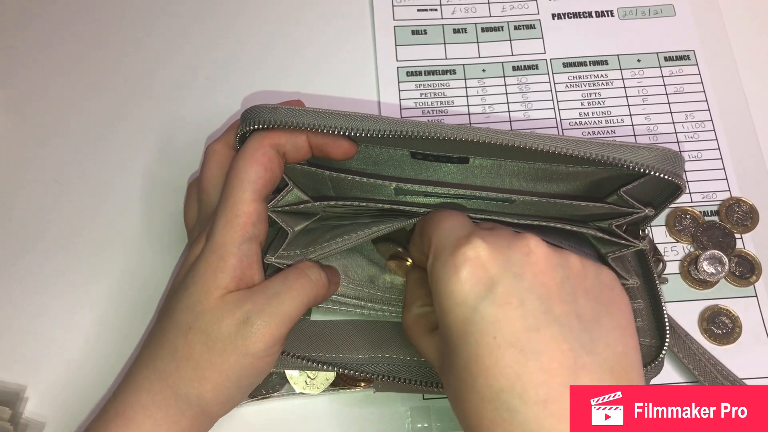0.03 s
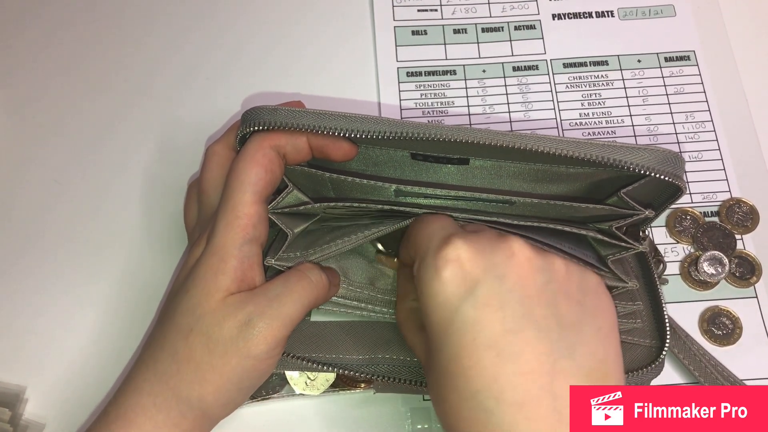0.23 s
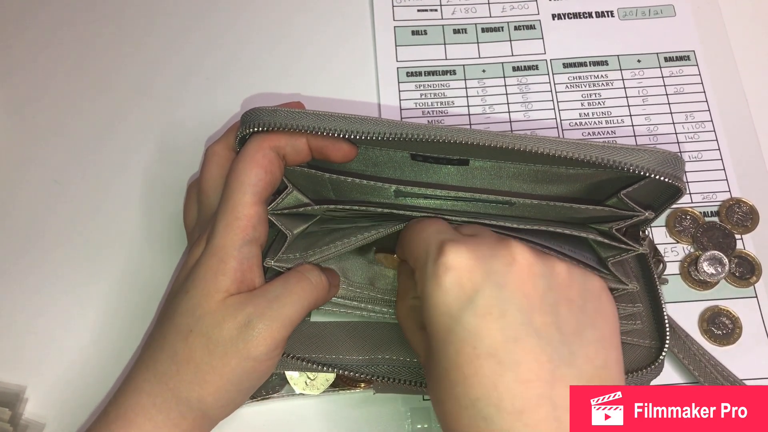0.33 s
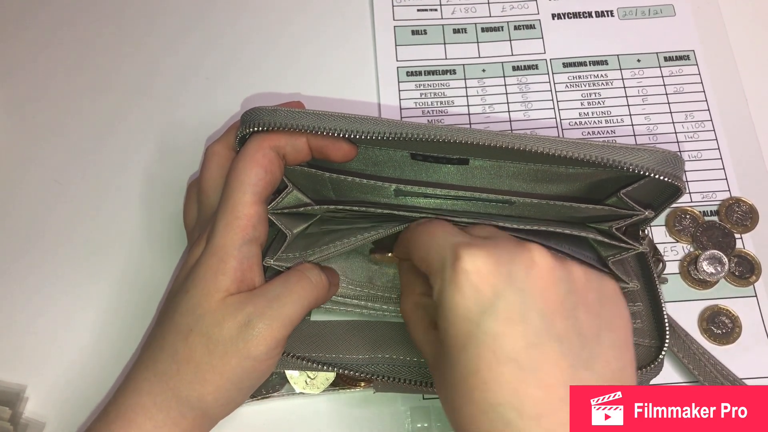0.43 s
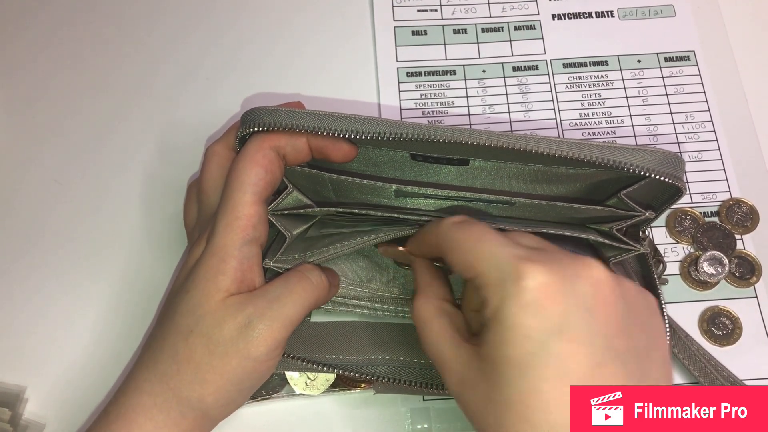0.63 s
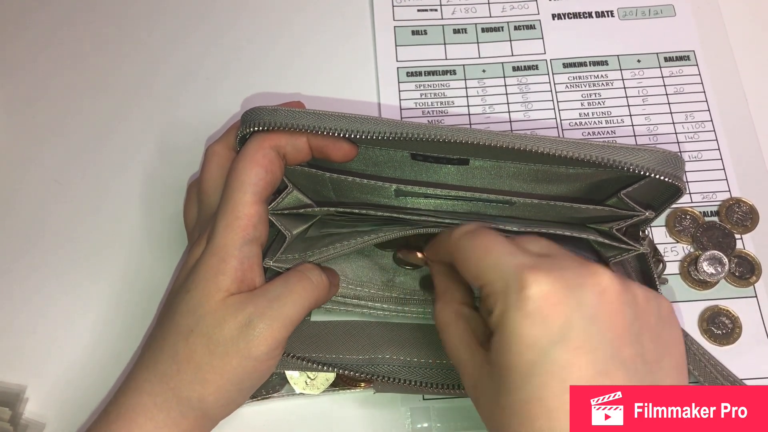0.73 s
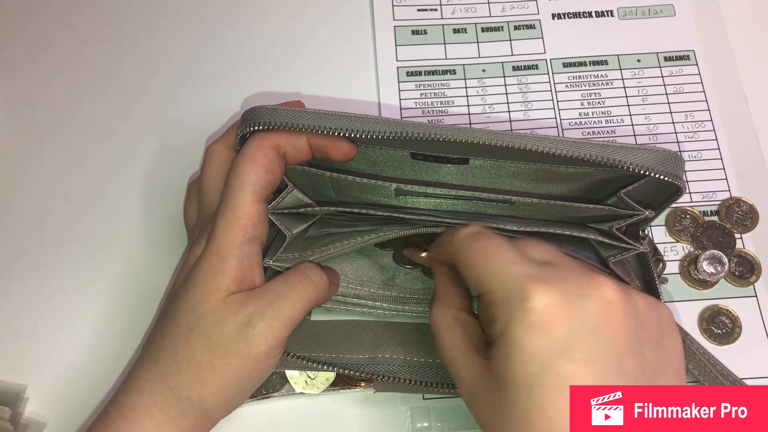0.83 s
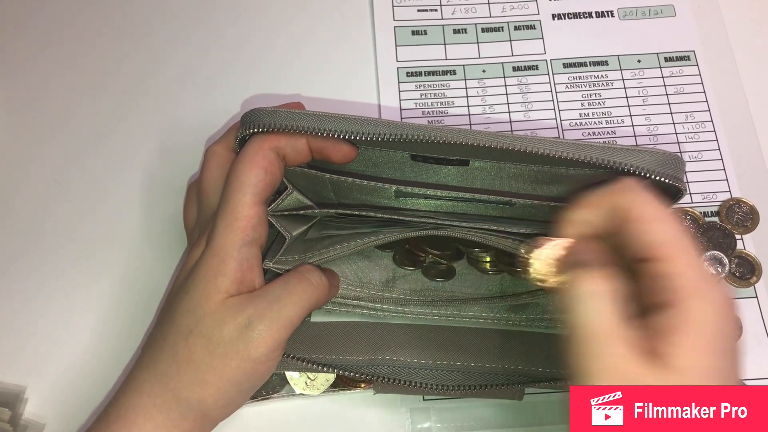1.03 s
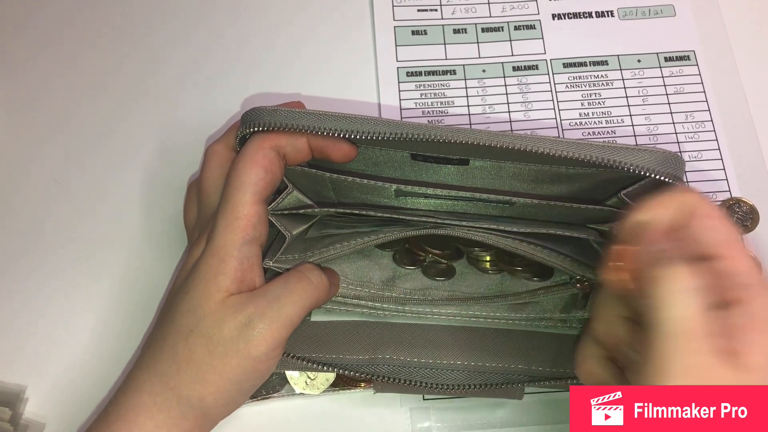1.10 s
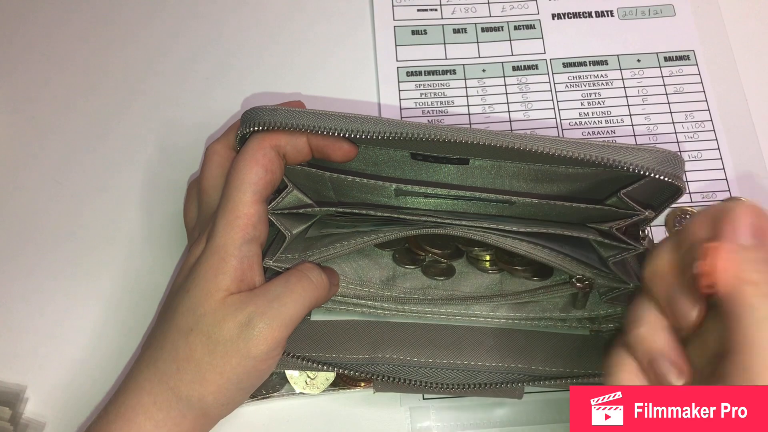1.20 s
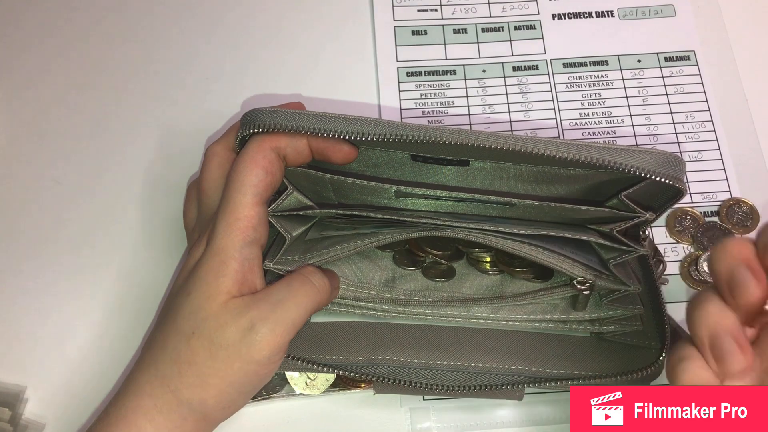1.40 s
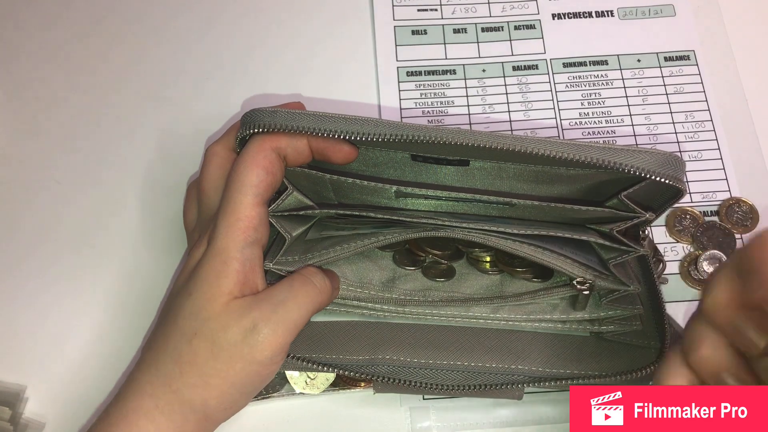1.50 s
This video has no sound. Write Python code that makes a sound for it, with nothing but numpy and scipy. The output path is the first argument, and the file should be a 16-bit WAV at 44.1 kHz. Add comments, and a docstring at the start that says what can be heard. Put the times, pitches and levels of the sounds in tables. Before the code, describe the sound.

Small coins clink in a wallet, close to the microphone. From about 0.1 to 0.45 seconds they slide and chatter with brief, very high rings, loudest near 0.2 seconds, while the lining rustles softly under the fingers. After a pause, a few more clicks and clacks come from 0.7 to 0.85 seconds. Faint ticks follow at 1 second, leaving quiet room air and a faint low hum.

```python
"""Coins picked from a zip wallet

On a table in a quiet room, close to the microphone, fingers pick out a few coins. Each contact is a tiny
chatter of metal that also knocks the wallet; loose coins ring very high and beat together, pinched ones
clack. In between, coins slide and the lining rustles. Behind lie room air, a faint mains hum and,
at the start, a soft low boom."""
import sys
import numpy as np
from scipy import signal
from scipy.fft import rfft, irfft, next_fast_len
from scipy.io import wavfile

SR = 44100
rng = np.random.default_rng(int(sys.argv[2]) if len(sys.argv) > 2 else 0)


def inscribe(sig):
    """Save sig as 16-bit PCM at rate SR to the path in sys.argv[1].

    A 1-D sig is mono; a 2-D sig holds one channel per row.
    Samples are clipped to [-1, 1] before scaling.
    """
    pcm = np.round(np.clip(np.atleast_2d(sig).T, -1, 1) * 32767)
    wavfile.write(sys.argv[1], SR, pcm.astype(np.int16))


N = 68355

# Spectrum of the room air: f/Hz, gain/dB
AIR_COLOUR = [(20, -36), (55, -5.5), (170, -11.5), (500, -23), (1000, -21.5), (2000, -29.5), (5000, -33),
              (16000, -37)]
# Coins sliding on each other, and fingers rubbing the lining: t/s, level/dB
SLIDE_LEVELS = [(0, -64), (.152, -74), (.168, -51), (.181, -53.5), (.205, -47), (.228, -41), (.25, -88),
                (.718, -88.5), (.729, -54.5), (.742, -55), (.748, -86), (.76, -63), (.805, -55.5),
                (.83, -73), (.9, -90.5)]
RUSTLE_LEVELS = [(0, -59), (.024, -61.5), (.06, -75), (.11, -68.5), (.3, -57), (.345, -64), (.4, -57),
                 (.47, -65.5), (.58, -66), (.63, -82), (.72, -80), (.775, -67), (.84, -66.5), (.89, -81.5),
                 (1.18, -82.5), (1.23, -76), (1.3, -84.5)]
# Spectra of that sliding and rubbing: f/Hz, gain/dB
SLIDE_COLOUR = [(500, -30), (4500, -20), (6500, -14), (11500, -11), (13200, -2), (15400, 0), (16000, -13)]
RUSTLE_COLOUR = [(300, 0.5), (550, -8), (1060, 2), (1210, -10.5), (1400, -1), (3300, -7), (4300, -6.5),
                 (7500, -11.5), (16000, -18)]
# Coin contacts: t/s, wallet knock/dB, knock centre/Hz, rim click/dB, sizzle/dB, chatter hold/ms, fade/ms
CONTACTS = [ (0.1015, -77, 2500, -51, -52, 0.36, 2), (0.1475, -67, 3030, -52.5, -50, 3.3, 1.5),
            (0.1615, -70, 3020, -50, -46, 0.56, .6), (0.1652, -69, 3000, -50, -46, 1, 1.5),
            (.2050, -48, 900, -62, -58, 1.8, 2.2), (0.2096, -53, 394, -51, -46, 4.7, 3.4),
            (0.2169, -41, 3600, -28.5, -19.5, 0.29, 0.23), (0.2259, -46, 3010, -53, -41, 0.41, 0.91),
            (.2582, -38, 3360, -34.5, -34.5, 1.34, 0.76), (0.2609, -45.5, 1300, -52, -66, 2, 6),
            (0.2882, -48, 3350, -44.5, -64, 1.1, 1.4), (.306, -52, 3000, -41.5, -70, 0.77, 1.5),
            (0.3068, -51, 1250, -47.5, -76, 0.86, 3.9), (0.357, -44, 2150, -52, -59, 1.1, 2.9),
            (0.3608, -43, 3570, -47.5, -49, 2.6, 1.6), (0.3641, -43, 3300, -41, -38, 1.6, 2.7),
            (0.3727, -59.5, 2520, -59, -54, 5.8, 0.89), (0.405, -44, 4030, -46, -42.5, 3.1, 3),
            (0.4220, -53.5, 2200, -56.5, -55, 2.6, 4.6), (0.7292, -52, 1600, -53, -64, 3.9, 2.1),
            (0.736, -52.5, 1210, -59, -56, 3.9, 3.1), (0.7558, -48, 1480, -60, -56, 1.1, 7.4),
            (0.7637, -38, 1200, -52, -62, 1.5, 1.2), (0.8075, -46, 3400, -41, -36, 1.3, 3.9),
            (0.8146, -49.5, 2920, -45.5, -44.5, 4.9, 4), (1.001, -59.5, 2600, -57.5, -63, 0.41, 1.9),
            (1.013, -63, 3400, -65, -83, 0.65, 1.4)]
# Spectra of the wallet's knock, the rims' click and the sizzle on top: f/Hz, gain/dB
WALLET_COLOUR = [(100, -24.5), (450, -6.5), (750, 0), (1050, 0), (1350, -2.5), (2000, -4.5), (2800, -3),
                 (4200, -2), (5100, -15.5), (9000, -23)]
RIM_COLOUR = [(300, -32.5), (2500, -10), (5000, -11.5), (5600, -3), (6400, -0.5), (7500, -5), (9200, 1),
              (10600, -7.5), (11800, -5.5), (13500, -2), (17000, -41)]
SIZZLE_COLOUR = [(7000, -38), (10500, -10), (12000, 0), (13200, 2), (14500, -4), (15700, -7), (16500, -22)]
# Touches that set loose coins ringing: t/s, relative level/dB, base t60/s, lead offset from COIN_HZ/Hz
RING_TOUCHES = [(0.1657, -56, 0.04, 0), (0.2097, -29, 0.07, 290), (0.2171, -23, 0.055, -4),
                (0.2324, -41.5, .3, -190), (0.2582, -44, .28, -190), (.2890, -35, 0.07, 0),
                (0.298, -38, 0.059, 290), (0.3056, -34, 0.065, -4), (0.3607, -22.5, 0.047, 224),
                (0.3721, -30.5, 0.05, -190), (0.382, -32, 0.066, 0), (0.3863, -28.5, 0.053, 1),
                (0.4065, -34.5, 0.049, 2), (0.423, -38.5, 0.042, -4), (0.807, -39, 0.024, -100)]
# Modes of the coins: offset from COIN_HZ/Hz, relative level/dB, multiple of the base t60
COIN_MODES = [(-745, -17, 0.4), (-190, -9, 1.4), (-3, -4, 0.78), (285, -11, 0.45), (1150, -29, 0.43)]
# Clacks of pinched coins and of the pocket they strike: t/s, f/Hz, level/dB
CLACKS = [(.2055, 275, -48), (0.2582, 2650, -37.5), (.2582, 3030, -37), (0.2597, 1353, -37),
          (0.3604, 3430, -39.5), (.3615, 275, -52.5), (0.407, 4310, -35.5), (0.4065, 2925, -37.5),
          (.4062, 855, -44.5), (0.7296, 5330, -39), (0.7301, 1014, -48), (.73, 320, -54.5),
          (.7638, 2306, -38), (.7638, 1050, -40), (.7638, 833, -45), (.7638, 383, -49), (.8076, 2760, -38),
          (.8078, 1032, -39), (0.8143, 9830, -27), (.8144, 3700, -43), (0.984, 2450, -64),
          (1.0011, 2530, -56.5), (1.013, 2460, -64)]
# Spectrum of the room's reflections: f/Hz, gain/dB
ROOM_COLOUR = [(200, 0), (1200, 1.5), (5000, -9.5), (16000, -10.5)]

COIN_HZ = 13185
GRAIN_S = .0007  # time scale of catching and slipping


def undb(db):
    """Decibels to gain."""
    return 10 ** (np.asarray(db) / 20)


def unit(x):
    """Scale to rms 1."""
    return x / np.sqrt(np.mean(x ** 2))


def colour(x, points, extra_db=None):
    """Causal filter through points of f/Hz, gain/dB; extra_db adds gain as a function of frequency."""
    size = 2 * next_fast_len(len(x))
    f = np.maximum(np.fft.rfftfreq(size, 1 / SR), 1)
    point_hz, point_db = np.array(points, float).T
    db = np.interp(np.log(f), np.log(point_hz), point_db) + (extra_db(f) if extra_db else 0)
    cepstrum = irfft(np.log(undb(db)))
    cepstrum[1:size // 2] *= 2  # fold to minimum phase
    cepstrum[size // 2 + 1:] = 0
    return irfft(rfft(x, size) * np.exp(rfft(cepstrum)))[:len(x)]


def add(out, start, x):
    """Mix x in at a time in seconds."""
    i = int(start * SR)
    out[i:i + len(x)] += x[:len(out) - i]


def decay(t, t60):
    """Fall by 60 dB every t60 seconds."""
    return np.exp(-np.log(1000) * t / t60)


def grains(t):
    """A random curve with a new value every GRAIN_S."""
    return np.interp(t / GRAIN_S, np.arange(len(t)), rng.standard_normal(len(t)))


def room_tone(hum_hz=49.3, boom_hz=52, boom_fade_s=.12):
    """Behind the wallet: room air, mains hum and a faint low boom dying away."""
    t = np.arange(N) / SR
    air = undb(-70.5) * unit(colour(rng.standard_normal(N), AIR_COLOUR))
    hum = undb(-73.5) * unit(np.sin(2 * np.pi * hum_hz * t))
    boom = undb(-58) * np.sin(2 * np.pi * boom_hz * t) * np.exp(-t / boom_fade_s)
    return air + hum + boom


def friction(levels, spectrum, grain_db):
    """Rubbing surfaces catch and slip: grainy noise that follows a level curve."""
    t = np.arange(N) / SR
    roughness = undb(grain_db * grains(t))
    rub = unit(colour(rng.standard_normal(N) * roughness, spectrum))
    return rub * undb(np.interp(t, *np.array(levels).T))


def chatter(env, strike_db=-7.5):
    """Metal meets metal: one clean impact, then a fading flurry of tiny ones with an even spectrum."""
    spectrum = rfft(env * rng.standard_normal(len(env)))
    flurry = irfft(spectrum / np.abs(spectrum)) * np.sqrt(env)
    flurry[0] += undb(strike_db) * np.sqrt(np.sum(flurry ** 2))
    return flurry


def coin_contacts(knock_lift_db=5.5, knock_width_oct=.41):
    """Each contact chatters and fades: a knock of the wallet, a click of the rims, a sizzle on top."""
    out, ms = np.zeros(N), np.arange(2048) / SR * 1000
    for start, knock_db, knock_hz, rim_db, sizzle_db, hold_ms, fade_ms in CONTACTS:
        env = np.exp(-np.maximum(ms - hold_ms, 0) / fade_ms)
        hollow = lambda f: knock_lift_db * np.exp(-.5 * (np.log2(f / knock_hz) / knock_width_oct) ** 2)
        knock = undb(knock_db) * unit(colour(chatter(env), WALLET_COLOUR, hollow))
        click = undb(rim_db) * unit(colour(chatter(env), RIM_COLOUR))
        sizzle = undb(sizzle_db) * unit(colour(chatter(env), SIZZLE_COLOUR))
        add(out, start, (knock + click + sizzle) * np.sqrt(np.mean(env ** 2)))
    return out


def coin_rings(level_db=-5, scatter_db=2.5, attack_s=.00074, grab_s=.0015):
    """Close modes of loose coins beat together until the next touch stops them and starts them anew."""
    out, t = np.zeros(N), np.arange(12000) / SR
    lead_db, lead_width_hz = 10, 140  # where a coin is touched decides which mode leads
    ends = [touch[0] for touch in RING_TOUCHES[1:]] + [N / SR]
    for (start, touch_db, t60, lead_hz), end in zip(RING_TOUCHES, ends):
        attack = 1 - np.exp(-t / attack_s)
        grab = np.exp(-np.maximum(t - (end - start), 0) / grab_s)
        for offset_hz, mode_db, t60_ratio in COIN_MODES:
            lift_db = lead_db * np.exp(-.5 * ((offset_hz - lead_hz) / lead_width_hz) ** 2)
            gain = undb(level_db + touch_db + mode_db + lift_db + scatter_db * rng.standard_normal())
            tone = np.sin(2 * np.pi * ((COIN_HZ + offset_hz) * t + rng.random()))
            add(out, start, gain * attack * grab * decay(t, t60 * t60_ratio) * tone)
    return out


def pinched_clacks(t60_at_1khz_s=.029, attack_s=.00037, wander_per_khz=.011):
    """Fingers and cloth quickly damp these resonances; the shifting grip blurs the high pitches."""
    out, t = np.zeros(N), np.arange(4096) / SR
    for start, hz, db in CLACKS:
        khz = hz / 1000
        t60 = t60_at_1khz_s * khz ** -.35  # higher pitches die sooner
        env = (1 - np.exp(-t / attack_s)) * decay(t, t60)
        pitch_hz = hz * (1 + wander_per_khz * khz * grains(t))
        cycles = np.cumsum(pitch_hz) / SR
        add(out, start, undb(db) * env * np.sin(2 * np.pi * cycles))
    return out


def room_reflections(direct, t60_s=.26, gap_s=.0044, level_db=-11):
    """The room returns a short diffuse tail to the microphone, duller than the direct sound."""
    t = np.arange(N // 2) / SR
    tail = rng.standard_normal(len(t)) * decay(t, t60_s) * (t > gap_s)
    tail = colour(tail / np.sqrt(np.sum(tail ** 2)), ROOM_COLOUR)
    return undb(level_db) * signal.fftconvolve(direct, tail)[:N]


def scene():
    """One microphone close to the wallet, the room behind it; the clacks stay dry."""
    slide = friction(SLIDE_LEVELS, SLIDE_COLOUR, grain_db=3.5)
    rustle = friction(RUSTLE_LEVELS, RUSTLE_COLOUR, grain_db=2)
    close = slide + rustle + coin_contacts() + coin_rings()
    return (close + pinched_clacks() + room_reflections(close) + room_tone())[None]


def record(dry):
    """The recorder cuts the top steeply above 15.9 kHz."""
    return signal.sosfilt(signal.ellip(8, .2, 70, 15900, fs=SR, output="sos"), dry)


dry = scene()
out = record(dry)
inscribe(out)
```